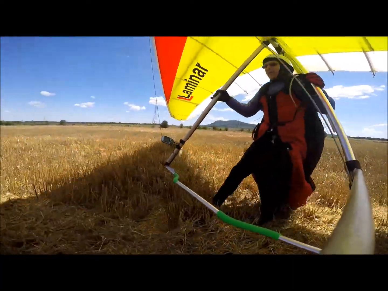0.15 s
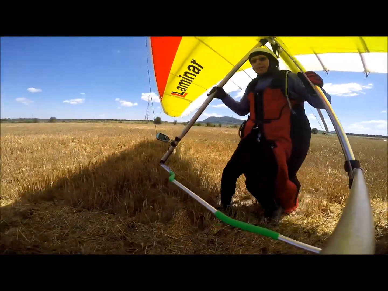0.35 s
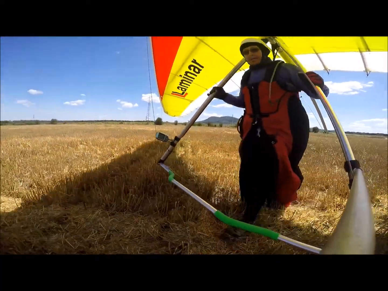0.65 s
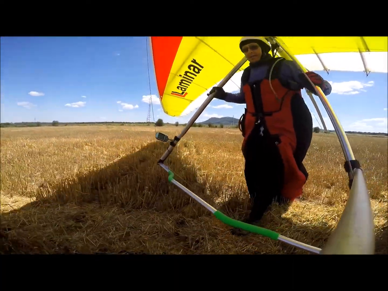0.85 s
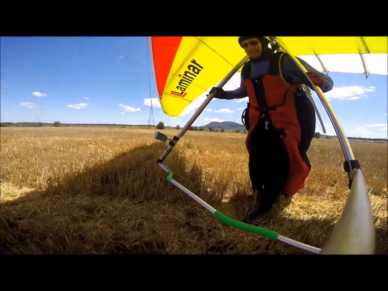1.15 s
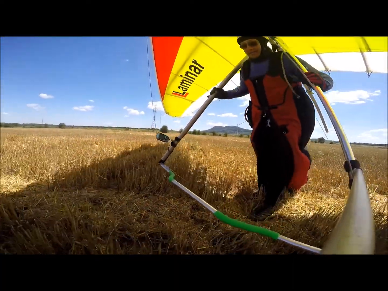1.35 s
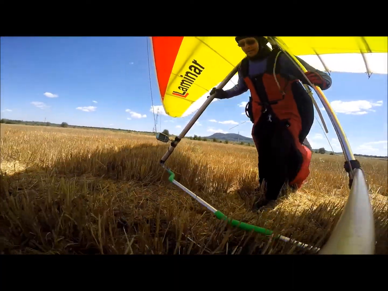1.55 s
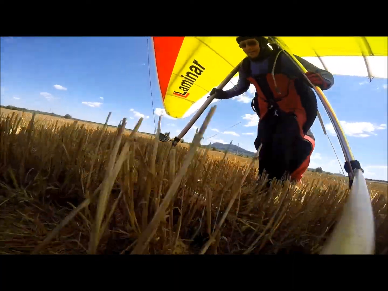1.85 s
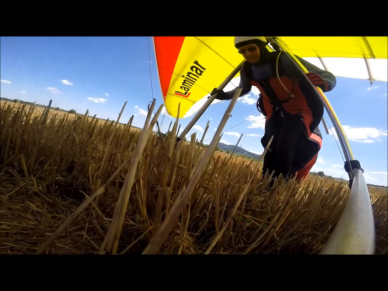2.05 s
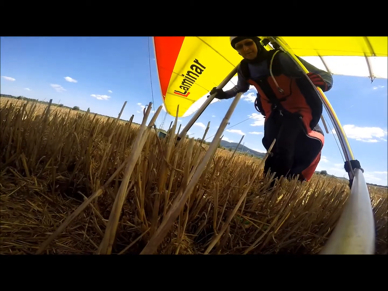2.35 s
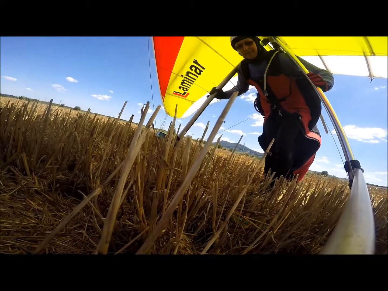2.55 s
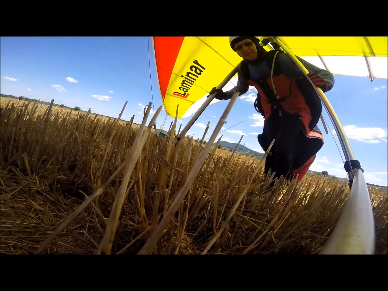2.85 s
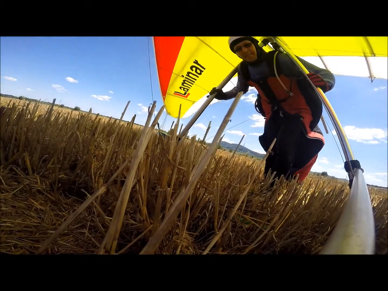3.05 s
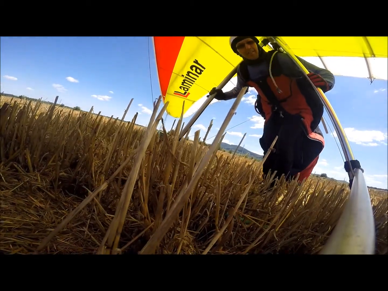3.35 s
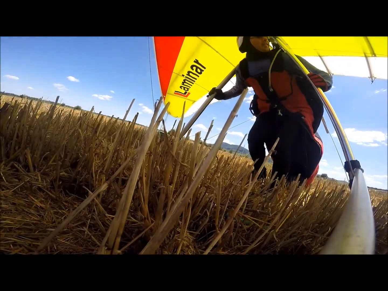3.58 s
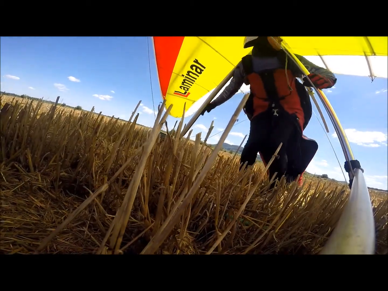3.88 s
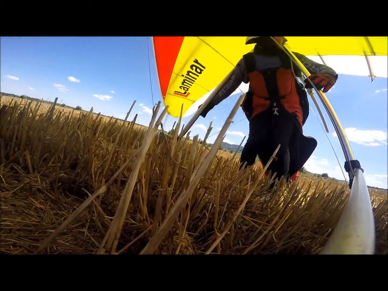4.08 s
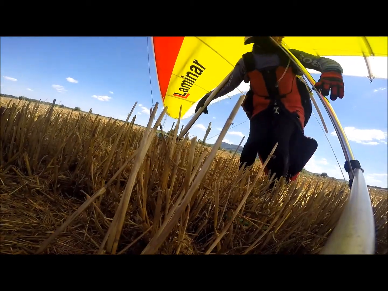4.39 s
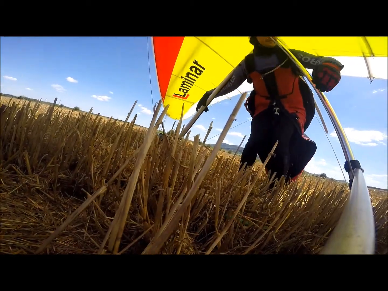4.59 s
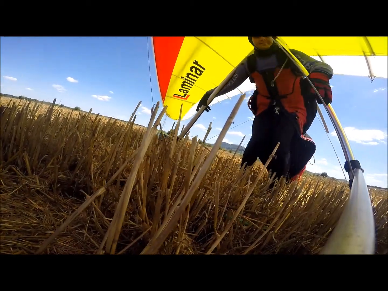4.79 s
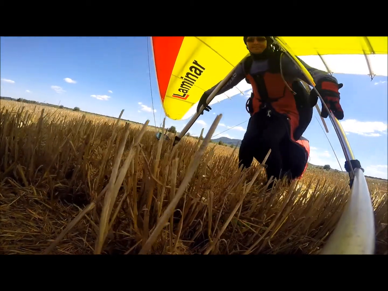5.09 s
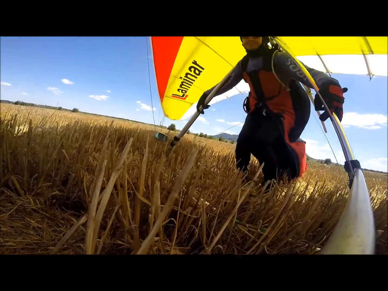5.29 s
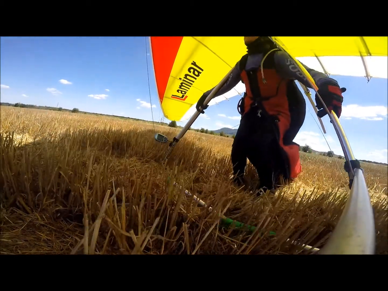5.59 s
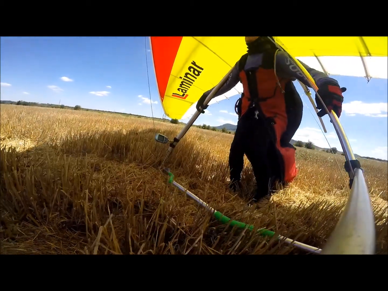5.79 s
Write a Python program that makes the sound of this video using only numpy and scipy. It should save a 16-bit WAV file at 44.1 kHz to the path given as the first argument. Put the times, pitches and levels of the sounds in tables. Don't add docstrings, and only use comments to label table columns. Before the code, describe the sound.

The microphone is clamped to a hang glider's tubing in an open stubble field, so most sound is muffled, boomy and close. At 0 s there are deep jolts, rattles and straw rustle; at 0.23 s a hard, bright metallic clank with a dry snap, then a quick falling squeak at 0.32 s. Low wind-shaken rumble and hollow knocks continue, with a short chirp near 0.97 s. Around 1.45-1.6 s dull knocks and crackling stalks lead to a heavy ringing thud at 1.83 s. From 2 to 4.7 s it is calmer: faint rubs, small ticks, clicks at 2.83 and 3.28 s, a sharper clack at 3.7 s and a knock near 4.5 s. Low bumps arrive at 4.77 and 5.15 s, with a tiny rising chirp at 4.89 s. A coarse, stuttering creak runs from 5.3 to 5.55 s, then light knocks end it. Faint hiss and thin high whine persist throughout.

```python
import sys
import numpy as np
from scipy import signal
from scipy.fft import rfft, irfft, next_fast_len
from scipy.io import wavfile
from scipy.ndimage import map_coordinates

SR = 44100
rng = np.random.default_rng(int(sys.argv[2]) if len(sys.argv) > 2 else 0)


def persist_wave(psi):
    counts = np.round(np.clip(psi, -1, 1) * 32767).astype(np.int16)
    wavfile.write(sys.argv[1], SR, np.atleast_2d(counts).T)


def makeup_ratio(level_db):
    decades = np.asarray(level_db, float) / 20
    return 10 ** decades


N = 261513


def unit(x):
    return x / np.sqrt(np.mean(x ** 2) + 1e-20)


def curves(rows):
    seconds, *columns = np.transpose(rows)
    return [np.interp(np.arange(N) / SR, seconds, column) for column in columns]


def wobble(rate):
    knots = rng.standard_normal(int(N * rate / SR) + 4)
    return map_coordinates(knots, [np.arange(N) * rate / SR])


def filtered(x, response):
    size = next_fast_len(N + SR // 2)
    gain = response(np.fft.rfftfreq(size, 1 / SR))
    gain_rms = np.sqrt(np.mean(abs(gain) ** 2))
    return irfft(rfft(x, size) * gain / gain_rms, size)[:N]


def coloured(points):
    f, db = np.transpose(points)
    return lambda hz: makeup_ratio(np.interp(np.log(hz + 1), np.log(f), db, left=-120, right=-120))


def modes(rows):
    return lambda f: sum(makeup_ratio(db) * 1j * f * width / (hz * hz - f * f + 1j * f * width)
                         for hz, width, db in rows)


def damped(f):
    return 1 / (1 + 1.1j * f / 4300 - (f / 4300) ** 2) ** 4


def grit(rate, depth_db):
    return unit(rng.standard_normal(N) * makeup_ratio(depth_db * wobble(rate)))


def specks(rate, spread_db):
    out = np.zeros(N)
    place, sign, size = rng.random((int(rate * N / SR), 3)).T
    impact = np.sign(sign - .5) * makeup_ratio(-spread_db * np.log(1 - .97 * size))
    np.add.at(out, (place * N).astype(int), impact)
    return unit(out)


def contacts(times, lengths, rise):
    t = np.arange(SR // 10) / SR
    for start, length in zip(times, lengths):
        onset = 1 - np.exp(-t / (rise + 0.69 * length ** 2))
        decay = np.exp(-(t / max(length, .001)) ** 0.95)
        yield round(start * SR), unit(onset * decay * rng.standard_normal(len(t))) / np.sqrt(10)


# frequency in Hz, density in dB per Hz.
HISS_SPECTRUM = [(200, 1.5), (3000, -11), (8000, -10), (15000, -17.5), (15600, -28)]


def camera():
    t = np.arange(N) / SR
    whine_hz, frame_hz, blank_s = 6308.7, 29.97, 2.8205
    flip = np.clip(6 * np.sin(np.pi * frame_hz * (t - blank_s)), -1, 1)
    whine = makeup_ratio(-62.5) * flip * np.sin(2 * np.pi * whine_hz * t)
    octave = makeup_ratio(-72.5) * np.sin(2 * np.pi * 2 * whine_hz * t)
    hiss = makeup_ratio(-69.0) * filtered(rng.standard_normal(N), coloured(HISS_SPECTRUM))
    return whine + octave + hiss


# time in seconds, brushing level in dB.
BRUSHING = [(0, -65.5), (.18, -50.5), (.26, -67.5), (.65, -63), (1.0, -70), (1.42, -75), (1.5, -59),
            (1.66, -66), (1.85, -55), (2.03, -66), (2.7, -78), (3.42, -81.5), (3.48, -68.5), (3.76, -60),
            (3.82, -75), (5.2, -77.5), (5.5, -64.5), (5.9, -73)]
# start in seconds, crack level in dB, top treble level in dB.
STALK_SNAPS = [(.001, -43, -49), (0.098, -57, -61.5), (0.127, -54, -59), (0.205, -39, -55),
               (0.2251, -20.5, -42), (0.314, -64, -63), (0.56, -48, -53), (0.626, -50, -64),
               (0.892, -54, -62), (1.421, -56, -74), (1.469, -37, -50.5), (1.498, -42.5, -50.5),
               (1.512, -49, -60), (1.592, -59, -60), (1.606, -41, -56), (1.616, -42, -56.5),
               (1.721, -66, -56), (1.739, -66, -55.5), (1.829, -50, -59), (1.867, -45, -57),
               (1.92, -50, -58), (1.928, -66, -58), (1.957, -46, -53.5), (2.179, -48, -56.5),
               (2.184, -47, -52.5), (2.287, -50, -57), (2.294, -53, -57.5), (2.825, -50, -69),
               (3.283, -44, -57), (3.479, -52, -59), (3.52, -55, -62), (3.68, -58, -57.5),
               (3.696, -38, -56.5), (3.733, -52, -58), (3.765, -52, -61), (4.765, -63, -67.5),
               (4.906, -58, -77.5), (5.14, -62, -63.5), (5.187, -63, -68), (5.231, -51, -57),
               (5.237, -53, -63.5), (5.392, -48, -61), (5.58, -58, -60.5)]
# frequency in Hz, density in dB per Hz.
STRAW_SPECTRUM = [(2700, -24), (3300, -2.5), (3900, 2), (4400, -4.5), (5000, -8), (6000, -9), (8000, -15)]
# frequency in Hz, density in dB per Hz.
AIR_SPECTRUM = [(4000, -24.5), (6000, -11.5), (7500, 3.5), (10000, -0.5), (13000, -0.5), (15200, -5.5),
                (15600, -13.5)]


def stubble():
    air_db, = curves(BRUSHING)
    straw_db = 0.9 * air_db + 0.24
    brush = makeup_ratio(1.2 * wobble(30))
    near = grit(110, depth_db=2.5) * brush * makeup_ratio(straw_db + 2.0)
    top = np.pad(grit(100, depth_db=2.0) * brush * makeup_ratio(air_db + 1.1), (0, SR))
    crack, snaps = np.zeros(N + SR), np.array(STALK_SNAPS)
    bursts = contacts(snaps[:, 0], np.full(len(snaps), .0022), rise=0.00013)
    for (i, burst), (_, crack_db, top_db) in zip(bursts, snaps):
        crack[i:i + len(burst)] += makeup_ratio(crack_db - 6.0) * burst
        top[i:i + len(burst)] += makeup_ratio(top_db + 2.0) * burst
    stalk = modes([(5100, 2200, 0), (7300, 1800, -6)])
    rustle = filtered(near, coloured(STRAW_SPECTRUM)) + filtered(top[:N], coloured(AIR_SPECTRUM))
    return rustle + filtered(crack[:N], lambda f: stalk(f) ** 3)


# start in seconds, first Hz, last Hz, level in dB, length in seconds.
FITTING_SLIDES = [
    (0.123, 860, 676, -23, 0.011),
    (0.124, 1650, 1420, -28.5, 0.013),
    (0.319, 1307, 496, -18.5, 0.027),
    (0.965, 883, 550, -25, 0.024),
    (4.887, 2036, 2300, -28.5, 0.014),
    (4.893, 2350, 2750, -33, .016),
]


def squeaks():
    out = np.zeros(N)
    for start, from_hz, to_hz, db, length in FITTING_SLIDES:
        u = np.linspace(0, 1, round(length * SR))
        turns = np.cumsum(from_hz * (to_hz / from_hz) ** u) / SR
        swell = np.sqrt(np.sin(np.pi * u).clip(0))
        out[round(start * SR):][:len(u)] += makeup_ratio(db) * swell * np.sin(2 * np.pi * turns)
    return out * makeup_ratio(4 * wobble(500))


# start in seconds, frequency in Hz, level in dB, 60 dB decay in seconds.
FITTING_RINGS = [(.228, 2112, -21, .16), (.228, 4235, -36, .1), (.227, 1725, -7, .035),
                 (.015, 2500, -10, .03), (.227, 1380, -11, .03), (.229, 407, -20, .14),
                 (.228, 119, -15, .12), (.227, 2945, -16, .028), (.227, 1970, -14, .025),
                 (.227, 3461, -24, .03), (.227, 6196, -22, .011), (1.829, 88, -6, .24),
                 (1.829, 149, -25, .15), (1.8285, 492, -8, .11), (1.828, 1007, -15, .06),
                 (1.828, 834, -18, .1), (1.829, 226, -20, .2), (1.83, 624, -22, .2),
                 (1.828, 1335, -20, .05), (1.829, 2159, -28, .04), (2.827, 2495, -17, .037),
                 (2.829, 5582, -42, .033), (2.828, 4910, -36, .02), (3.285, 6290, -42, .019),
                 (3.285, 7800, -47, .03), (3.6937, 1023, -15, .12), (3.694, 2116, -26, .05),
                 (3.694, 2821, -28, .04), (3.694, 3445, -28, .035), (3.696, 3035, -38, .3),
                 (3.695, 5593, -42, .04), (4.895, 2130, -33, .09), (2.827, 1787, -21, .039),
                 (3.694, 1793, -24, .05), (1.867, 1500, -24, .015), (1.867, 2950, -26, .015),
                 (3.731, 3850, -40, .025), (1.107, 2550, -31, .04), (1.421, 2550, -29, .04),
                 (.78, 2500, -29, .04), (2.22, 2750, -34, .03), (.339, 610, -20, .05),
                 (4.905, 6245, -57, .03), (4.907, 5630, -58, .06), (5.233, 6150, -52, .03),
                 (5.234, 7700, -54, .035), (3.287, 5590, -68, 2), (4.725, 4237, -62, 1.6),
                 (4.76, 5630, -69, 2), (5.84, 4250, -66, 1.5)]


def ringing():
    out, t = np.zeros(N + SR), np.arange(SR) / SR
    flutter, waver = wobble(90), wobble(60)
    onset = 1 - np.exp(-t / 0.00012)
    for k, (start, hz, db, t60) in enumerate(FITTING_RINGS):
        own = slice(k * SR // 12, k * SR // 12 + SR)
        loose = min(hz / 1000, 1)
        size = makeup_ratio(db - 60 * t / t60 + 2.7 * loose * flutter[own]) * onset
        phase = 2 * np.pi * hz * t + .35 * loose * waver[own]
        out[round(start * SR):][:SR] += size * np.sin(phase)
    return out[:N]


# start in seconds, load in dB, bite (treble over load) in dB.
JOINT_SLIPS = [(5.289, -23.5, -16), (5.298, -26.5, -17), (5.335, -18.5, -7.5), (5.354, -19.5, -11),
               (5.366, -24, -2.5), (5.376, -22.5, -6), (5.388, -24, -3), (5.396, -23, -1.5),
               (5.402, -28, 2), (5.41, -22, -6), (5.418, -19.5, -1.5), (5.427, -19, -4), (5.438, -19, -3),
               (5.452, -16.5, -6), (5.466, -18, -2), (5.479, -17.5, -8), (5.488, -26, 2), (5.498, -19, -6),
               (5.507, -23, -3), (5.5204, -18, -8), (5.539, -26.5, -7), (5.551, -33, -12)]
# frequency in Hz, width in Hz, level in dB.
JOINT_MODES = [(250, 55, 1.5), (484, 140, 8), (878, 260, 4.5), (1084, 130, -9), (1420, 200, 2),
               (1712, 154, 6), (2150, 64, 0.5), (2353, 117, 6.5), (2900, 91, -2), (3500, 170, 1),
               (3800, 140, -3)]


def creak():
    drive, slips = np.zeros((2, N + SR)), np.array(JOINT_SLIPS)
    jerk = np.zeros(SR // 10)
    jerk[[10, 55, 95]] = 9, 12, 7
    bursts = contacts(slips[:, 0], np.full(len(slips), .008), rise=0.0012)
    for (i, chatter), (_, load_db, bite_db) in zip(bursts, slips):
        level = makeup_ratio(load_db + np.array([[0], [bite_db]]))
        drive[:, i:i + len(jerk)] += level * (jerk + 0.24 * chatter)

    def bright(f):
        return (f / 1500) ** 6 / (1 + (f / 1500) ** 6)

    def joint(f):
        return modes(JOINT_MODES)(f) ** 2 * damped(1.024 * f) ** 2

    dull = filtered(drive[0, :N], lambda f: joint(f) * (1 - bright(f)))
    sharp = filtered(drive[1, :N], lambda f: joint(f) * bright(f) / (1 + (f / 4100) ** 16))
    return makeup_ratio(3.0) * dull + makeup_ratio(-5.5) * sharp


# time in seconds, strength in dB, wire tension in dB (taut: more hum, less bend).
WIND_SHAKE = [(0, -25, 11.5), (.18, -46, 9.5), (.3, -15.5, -0.5), (.68, -20.5, -6), (1.12, -20.5, 3.5),
              (1.57, -17.5, -1), (1.72, -30, -6.5), (1.95, -23, -3.5), (2.28, -23.5, -2), (2.74, -31, 2),
              (3.63, -31, -6.5), (4.11, -26, 5), (4.39, -26, -4), (4.57, -26, -1), (4.68, -34, -1),
              (5.02, -30, -5.5), (5.24, -21, 1), (5.81, -29.5, -6.5)]
# time in seconds, mode struck in Hz, level in dB, swell in seconds.
STEP_JOLTS = [(0, 24, -8, 0.045), (0, 130, -22.5, 0.036), (.11, 77, -9.5, 0.032), (0.248, 46, -13, 0.02),
              (.25, 130, -37, 0.033), (0.991, 46, -13.5, 0.0092), (.99, 24, -24, 0.093),
              (1.042, 77, -21.5, 0.052), (1.55, 130, -40, 0.067), (1.85, 24, -25, 0.056),
              (1.85, 46, -35, 0.017), (1.85, 77, 0.5, 0.019), (1.851, 130, -12, 0.032),
              (4.72, 46, -47, 0.016), (4.771, 24, -2.5, 0.014), (4.891, 77, -16.5, 0.088),
              (5.145, 46, -5, 0.015), (5.15, 77, -12, 0.042)]
# frequency in Hz, width in Hz.
MOUNT_MODES = [(24, 13), (46, 18.7), (77, 7.5)]
# frequency in Hz, density in dB per Hz.
RUMBLE_SPECTRUM = [(90, -14.5), (105, -0.5), (130, 2), (150, -10), (200, -12.5), (230, -11.5), (300, -15),
                   (380, -15.5)]


def mount():
    strength_db, taut_db = curves(WIND_SHAKE)
    rub_db = curves(RUBBING)[0]
    rumble_db = -6 + 0.53 * (rub_db - strength_db)
    sway_db = -15.5 + 0 * taut_db
    size = makeup_ratio(strength_db + np.array([sway_db, -taut_db, taut_db, rumble_db]))
    t = np.arange(N) / SR
    centres = np.array([hz for hz, _ in MOUNT_MODES] + [130])
    for time, hz, db, swell in STEP_JOLTS:
        size[np.argmin(abs(centres - hz))] += makeup_ratio(db) * np.exp(-abs(t - time) / max(swell, .005))
    out = size[-1] * makeup_ratio(-4.5) * filtered(grit(23, depth_db=3.5), coloured(RUMBLE_SPECTRUM))
    for drive, (hz, width) in zip(size, MOUNT_MODES):
        mode, skirt = modes([(hz, width, 0)]), modes([(hz, 2.88 * width, 0)])
        swing = filtered(rng.standard_normal(N + SR), lambda f: mode(f) * skirt(f) ** 2)
        reach = abs(signal.hilbert(swing, next_fast_len(N))[:N])
        out += drive * unit(swing / (reach + 1.5) ** 0.11)
    return out


# time in seconds, effort in dB, bite (treble over effort) in dB.
RUBBING = [(0, -39, -5), (.16, -35.5, -16), (.57, -45, -8), (.73, -39, -18), (.97, -48.5, -8),
           (1.46, -38, -19.5), (1.77, -31, -8), (1.99, -39.5, -5.5), (2.17, -38, -4.5),
           (2.75, -53.5, -10.5), (3.16, -52.5, -13), (3.24, -43.5, 1), (3.65, -39.5, -1), (3.78, -34, -16),
           (3.9, -44, -6), (4.78, -43, -6.5), (5.26, -36.5, -12), (5.85, -38, -11.5)]
# time in seconds, swell in seconds, effort in dB, bite in dB.
SHORT_RUBS = [(.002, 0.0032, -27.5, -2), (0.169, 0.012, -30, -12), (.25, 0.015, -29, -10),
              (.345, 0.032, -37.5, -1.5), (.43, 0.01, -45, -9), (.73, 0.015, -39, -10),
              (.857, 0.0091, -41, -7), (0.899, 0.013, -39, -12), (0.974, 0.012, -45, -7),
              (1.305, 0.0072, -51, 3), (1.46, 0.0032, -24, -12), (1.499, 0.0031, -32, -14),
              (1.63, 0.022, -50, 0), (1.745, .012, -35, -3), (1.797, 0.011, -39.5, 5),
              (2.06, 0.018, -61, -10), (2.33, 0.04, -48.5, -1), (2.5, 0.013, -52.5, 8),
              (2.66, 0.042, -41, -14), (2.887, 0.0073, -40.5, -6.5), (2.93, .005, -46, -15),
              (2.96, 0.0047, -51, -10), (3.044, .01, -46.5, 5), (3.19, 0.02, -61, 6), (3.35, 0.05, -51, 0),
              (3.455, 0.064, -53, 11), (3.62, 0.011, -38, -11), (3.752, .012, -42, -2),
              (3.84, 0.014, -45, -28), (4.08, 0.057, -58, 0), (4.3, 0.096, -49.5, -15),
              (4.58, 0.0086, -46, 1), (4.737, 0.0082, -43, 3), (4.965, 0.012, -47.5, 2.5),
              (5.05, 0.013, -47, -11), (5.101, 0.021, -37, -7.5), (5.272, 0.0034, -41, -7),
              (5.565, 0.012, -39, -15), (5.59, .005, -44, 6), (5.637, 0.0071, -52, 9),
              (5.746, 0.015, -44.5, 8.5), (5.805, 0.016, -34.5, -3.5), (5.842, 0.0077, -32.5, -31)]
# start in seconds, level in dB, narrowness (scales the drive dB), contact in seconds.
SOFT_KNOCKS = [(.043, -22.5, 2.1, 0.0025), (.146, -22.5, 0.47, 0.0087), (.283, -21, 1.2, 0.0073),
               (.425, -29.5, 2.3, 0.0066), (.436, -32, 1.8, 0.0034), (.447, -25, 0.68, 0.0032),
               (.574, -33.5, 0.66, .012), (.558, -28, 0.95, 0.035), (.627, -30, 1.2, 0.0039),
               (.643, -16, 0.63, 0.0033), (.653, -21.5, 0.53, 0.0035), (.66, -28, 0.6, 0.0044),
               (.779, -21, 0.46, 0.0078), (1.032, -37, 1.8, 0.029), (1.333, -36.5, 0.61, 0.017),
               (1.465, -13, 1.17, 0.012), (1.476, -35, 2.9, 0.011), (1.501, -14.5, 1.2, 0.011),
               (1.611, -24.5, 0.68, 0.01), (1.784, -20, 1.2, 0.0054), (1.826, -9, 0.66, 0.0095),
               (1.848, -23, 1, .006), (1.858, -22, 1, 0.0057), (1.878, -24, 1, .008),
               (1.894, -26.5, 0.95, 0.0035), (2.181, -38.5, 0.26, 0.0023), (2.855, -35, 0.92, 0.0059),
               (3.132, -39, 0.7, 0.004), (3.214, -40, .6, 0.003), (3.528, -31.5, 0.36, 0.01),
               (4.5, -25, 0.95, 0.046), (4.888, -41, 0.074, 0.019), (5.03, -30, 0.42, 0.0027),
               (5.065, -29.5, 0.48, 0.066), (5.111, -27, 1.2, 0.016), (5.796, -32, 0.65, 0.014),
               (5.815, -24.5, 1.6, 0.0097)]
# start in seconds, level in dB, narrowness, contact in seconds.
FIRM_KNOCKS = [(.066, -26.5, 0.6, 0.0021), (.082, -38, 1.5, 0.0025), (.122, -30, 0.67, 0.0097),
               (.203, -30, 0.9, 0.002), (.2268, -16, 0.3, 0.0012), (.323, -20.5, 0.3, 0.0091),
               (.82, -24, 0.81, 0.008), (.881, -30, 1.9, 0.0096), (.969, -31.5, 1.6, 0.0083),
               (1.069, -43, 0.87, .001), (1.194, -35.5, 1, 0.00093), (1.219, -33.5, 1, 0.00089),
               (1.24, -33, 0.92, .001), (1.251, -42.5, .8, .002), (1.282, -40, 0.84, .001),
               (1.294, -38, 0.89, .002), (1.365, -38, 1, .004), (1.562, -26.5, 1.1, 0.016),
               (1.75, -24.5, 0.77, 0.017), (1.912, -28.5, 0.57, 0.01), (2.287, -33.5, 0.33, 0.024),
               (2.576, -37, 0.5, 0.013), (2.927, -48, 1.4, .002), (2.942, -46, 1.2, .002),
               (2.984, -42, 0.43, 0.018), (3.063, -37, 0.4, 0.002), (3.068, -39, 0.4, 0.002),
               (3.548, -35, 0.33, 0.0088), (3.693, -22, 0.12, 0.0012), (3.732, -37.5, .15, 0.0085),
               (3.787, -25.5, 0.66, 0.027), (4.484, -23.5, 0.9, 0.0062), (4.574, -36.5, 0.74, 0.0046),
               (5.22, -28, 0.65, 0.0042), (5.271, -57, 1.5, 0.0027), (5.603, -34, 1.4, 0.008),
               (5.663, -30, 0.55, 0.0096), (5.743, -33, 0.33, .008), (5.752, -27, 0.9, 0.013),
               (5.838, -38, 1.6, 0.0051)]
# start in seconds, level in dB, narrowness, contact in seconds.
HARD_KNOCKS = [(.013, -16.5, 0.36, 0.0054), (1.105, -29.5, 0.64, 0.0085), (1.164, -36, 0.5, 0.004),
               (1.419, -26.5, 1.2, 0.0063), (1.476, -24, 0.45, 0.0055), (1.866, -28, 0.3, 0.003),
               (2.22, -31.5, 0.43, 0.011), (2.826, -22.5, 0.83, 0.0053), (3.078, -41, 0.15, 0.002),
               (3.094, -38, .5, 0.007), (3.283, -35, 0.12, 0.0091), (5.234, -34, 0.96, 0.0037),
               (5.632, -45, 1.2, 0.012), (3.083, -43, .1, .003), (2.507, -46, .6, .004),
               (2.328, -44, .8, .005), (2.102, -43, .2, .006), (2.632, -50, .1, .003),
               (3.272, -43, .1, .002), (1.912, -38, .2, .001), (.083, -42, .05, .001)]
# frequency in Hz, width in Hz, level in dB.
LOW_MODES = [(221, 130, 3), (429, 37.5, 3.5), (491, 102, 2), (623.4, 38, 3.5)]
# frequency in Hz, width in Hz, level in dB.
MIDDLE_MODES = [(880, 95, 1.5), (1014, 120, -8.5), (1259, 82, -11.5)]
# frequency in Hz, width in Hz, level in dB.
HIGH_MODES = [(1676, 86, 5), (1772, 106, 1.5), (1952, 30, -0.5)]
# frequency in Hz, width in Hz, level in dB.
UPPER_MODES = [(2439, 44, 8), (2582, 89, 11), (2896, 190, -0.5), (3310, 210, -7), (3890, 580, -7.5)]
# centre in Hz, width in Hz.
GROUP_BANDS = [(480, 490), (1050, 357), (1800, 282), (2900, 5300)]


def rubbing_drive():
    effort_db, bite_db = curves(RUBBING)
    low, high = makeup_ratio(effort_db), makeup_ratio(effort_db + bite_db)
    t = np.arange(N) / SR
    for time, swell, db, bite in SHORT_RUBS:
        stroke = makeup_ratio(db) * np.exp(-((t - time) / swell) ** 2)
        low, high = low + stroke, high + makeup_ratio(bite) * stroke
    rub = grit(70, depth_db=2) + 0.64 * specks(140, spread_db=2.0)
    rub = unit(rub) * makeup_ratio(1.5 * wobble(10) + 2.6 * np.array([wobble(22) for _ in range(4)]))
    drive = rub * [low, low, high, high] * makeup_ratio([[-5.0], [-7.5], [-3.5], [-12.0]])
    drive[3] = makeup_ratio(-6.0) * filtered(drive[3], modes([(2500, 3400, 0)]))
    return drive


def knock_drive():
    kinds = [(SOFT_KNOCKS, (-0.5, -9, -20.5, -29)),
             (FIRM_KNOCKS, (-17, -1.5, -10, -24)),
             (HARD_KNOCKS, (-30, -14.5, 1, -2.5))]
    knocks = np.array([(start, *(db + narrow * np.array(kind_db)), length)
                       for rows, kind_db in kinds for start, db, narrow, length in rows])
    drive = np.zeros((4, N + SR))
    bursts = contacts(knocks[:, 0], knocks[:, 5], rise=0.000098)
    for (i, burst), row in zip(bursts, knocks):
        level_db, length = row[1:5], row[5]
        drive[:, i:i + len(burst)] += makeup_ratio(level_db[:, None] - 3.0) * burst
        drive[:, i + 30] += 6 * makeup_ratio(level_db - 390 * length)
    return drive[:, :N]


def tubes():
    out = np.zeros(N)
    groups = (LOW_MODES, MIDDLE_MODES, HIGH_MODES, UPPER_MODES)
    for drive, rows, (hz, width) in zip(rubbing_drive() + knock_drive(), groups, GROUP_BANDS):
        group, band = modes(rows), modes([(hz, width, 0)])
        out += filtered(drive, lambda f: group(f) * band(f) ** 2 * damped(f))
    return out


def scene():
    mix = camera() + stubble() + squeaks() + ringing() + creak() + mount() + tubes()
    return mix[None]


def top_cut(x):
    return signal.sosfilt(signal.butter(12, 15800, fs=SR, output="sos"), x)


def record(dry):
    limited = dry / (1 + abs(dry / .97) ** 12) ** (1 / 12)
    return top_cut(limited)


dry = scene()
out = record(dry)
persist_wave(out)
```